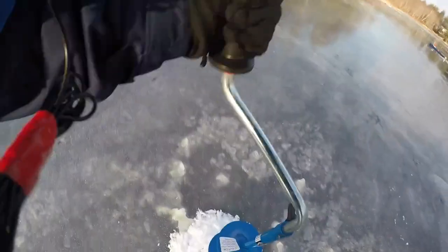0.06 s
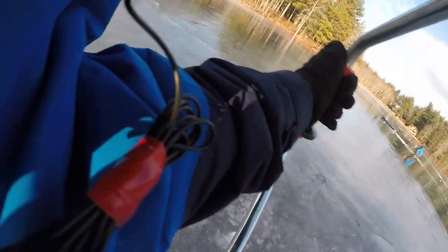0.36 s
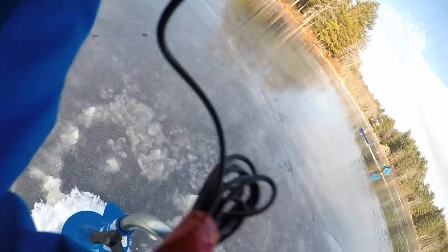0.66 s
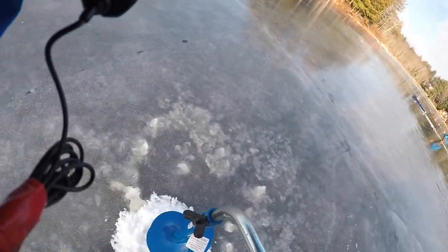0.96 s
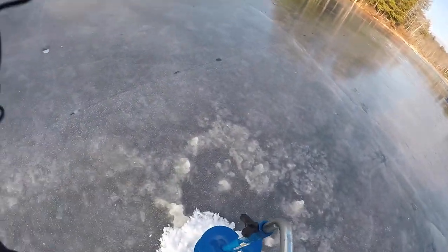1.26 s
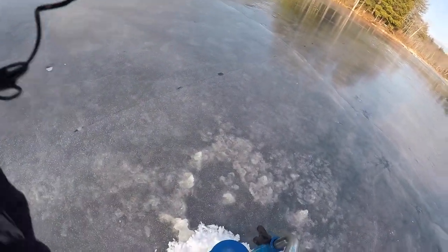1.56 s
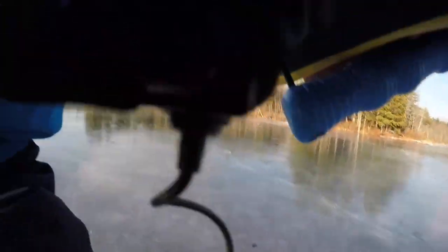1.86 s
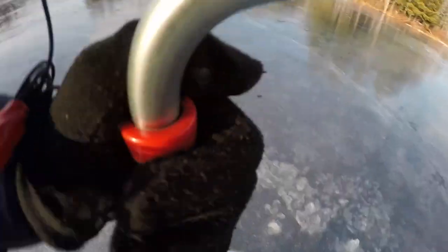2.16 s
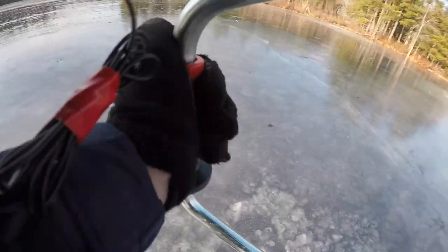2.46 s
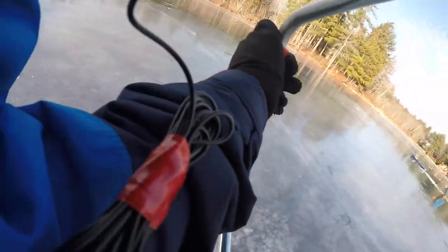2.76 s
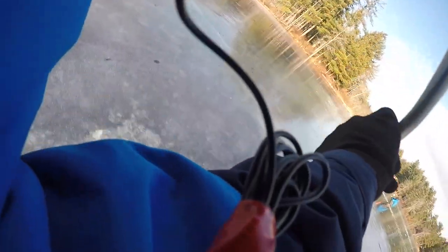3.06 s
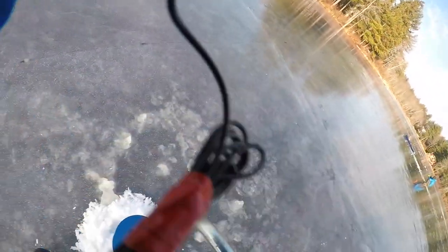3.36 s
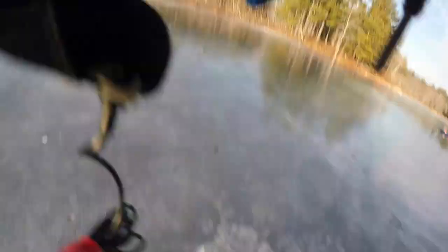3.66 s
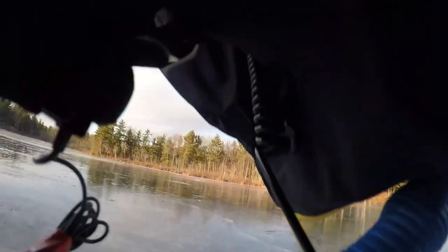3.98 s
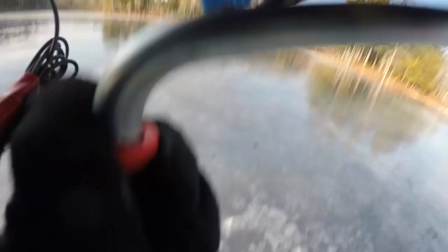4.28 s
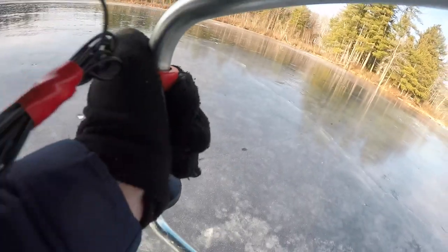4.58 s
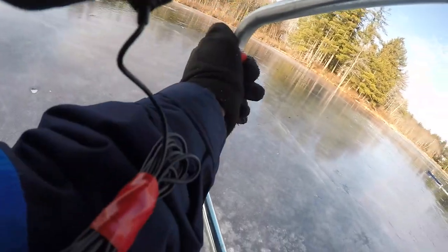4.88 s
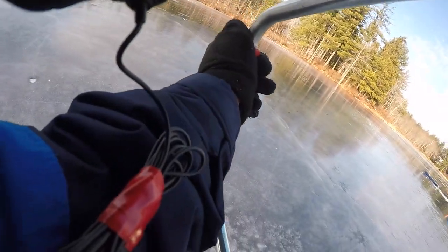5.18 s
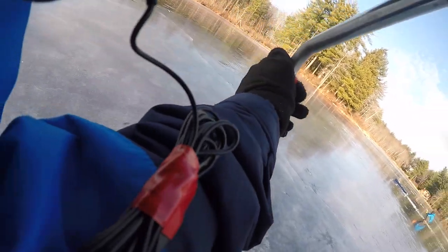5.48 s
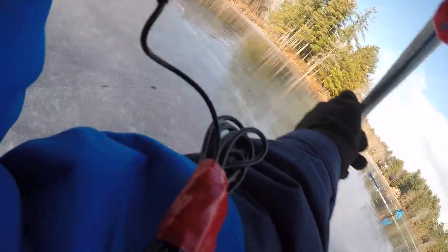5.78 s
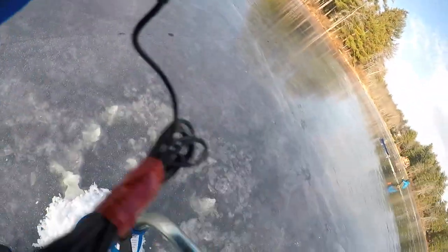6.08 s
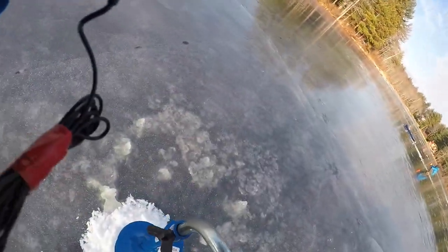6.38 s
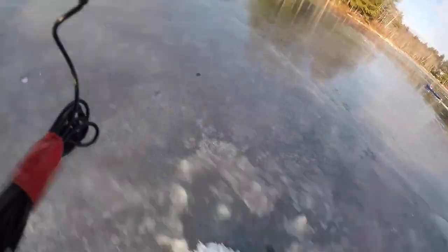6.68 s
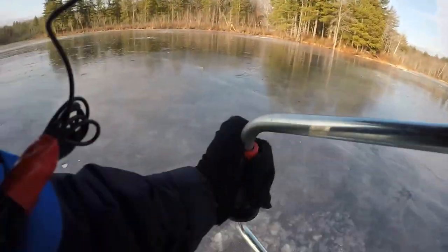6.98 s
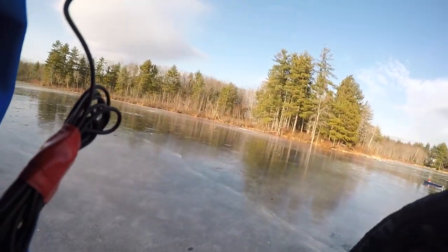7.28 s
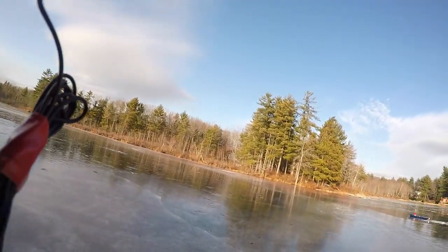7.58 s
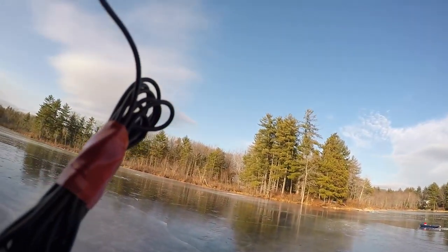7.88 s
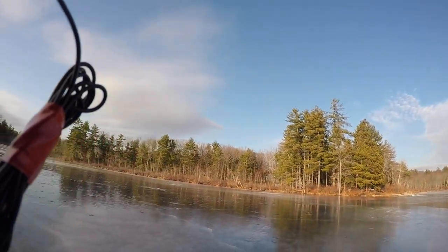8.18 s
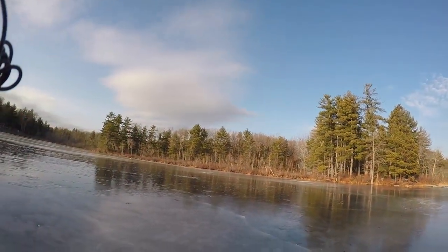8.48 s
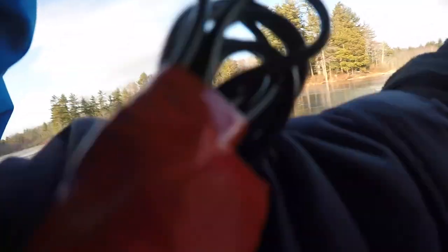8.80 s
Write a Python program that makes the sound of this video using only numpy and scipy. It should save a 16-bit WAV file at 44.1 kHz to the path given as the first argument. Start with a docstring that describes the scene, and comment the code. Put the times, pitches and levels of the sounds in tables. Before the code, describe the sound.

A hand auger grinds unevenly into ice while close gear ticks and a loose microphone plug pops, crackles and cuts the sound out.

```python
"""Hand auger in pond ice

Out on a frozen pond, an arm's length from the auger, with the microphone worn on the driller's jacket.
The blades shave and bite in uneven strokes and ring the steel; cloth rubs and hard bits of gear tick
right by the microphone. Its plug is loose: it pops, crackles in bursts and cuts the sound out."""
import sys
import numpy as np
from scipy import signal
from scipy.fft import rfft, irfft
from scipy.io import wavfile
from scipy.ndimage import uniform_filter1d

SR = 44100
rng = np.random.default_rng(int(sys.argv[2]) if len(sys.argv) > 2 else 0)


def waveform_to_disk(signal):
    """Save audio, clipped to [-1, 1], as 16-bit WAV at the path in sys.argv[1]."""
    frames = np.transpose(np.atleast_2d(signal))
    scaled = np.clip(frames, -1, 1) * 32767
    samples = np.round(scaled).astype(np.int16)
    wavfile.write(sys.argv[1], SR, samples)


N = 398663
TIME = np.arange(N) / SR

# Spectral shapes of the air, input hiss, sway, grinding, chips, bites, cloth, sparks: freq_hz, level_db
AIR_SPECTRUM = [(20, 4.5), (100, 2.5), (300, -5.5), (1000, -8), (3000, -18.5), (15000, -24)]
HISS_SPECTRUM = [(20, 20.5), (200, -1), (700, -3.5), (2000, -16), (15000, -25)]
SWAY_SPECTRUM = [(8, -1.5), (22, -3.5), (40, -7), (80, -10), (150, -19.5), (240, -24.5), (450, -37.5),
                 (1500, -85.5)]
GRIND_SPECTRUM = [(40, -13), (120, 0), (250, 3), (350, 3), (470, -2), (850, -1.5), (1600, -9),
                  (2300, -19.5), (3500, -15), (8000, -55)]
CHIP_SPECTRUM = [(500, -48), (1500, -8), (2400, 5), (4000, -3.5), (6000, -3.5), (8000, -7), (10500, -10.5),
                 (15500, -17.5)]
BITE_SPECTRUM = [(40, -20.5), (130, 4), (400, -2.5), (800, 2), (1500, -1.5), (2500, -10.5), (5000, -13.5),
                 (8000, -16), (11000, -18), (15500, -28.5)]
CLOTH_SPECTRUM = [(59, -10), (100, -5.5), (452, -16), (660, -15), (764, -17.5), (831, -18), (1090, -22),
                  (1660, -23.5), (2230, -26.5), (6350, -29), (15000, -40)]
SPARK_SPECTRUM = [(20, 1.5), (60, 18.5), (150, 8), (350, 5.5), (700, 1.5), (1500, -1), (3000, -4.5),
                  (6000, -8.5), (10000, -11.5), (15500, -15.5)]
# Resonances of the steel, while shaving and under a deep bite: centre_hz, width_hz, boost_db
SHAVING_MODES = [(470, 40, -1.5), (627, 51, 9.5), (870, 83, -0.5), (1036, 36, 10), (1155, 55, 10.5),
                 (1418, 44, 5.5), (1810, 81, 2), (2400, 270, -7.5), (2980, 150, 2.5), (3620, 150, 3),
                 (4140, 220, 2), (5130, 130, 4), (6600, 98, 1.5), (7550, 220, 1)]
BITING_MODES = [(340, 45, 8), (625, 49, 7.5), (970, 83, 3), (1177, 46, 9), (2220, 140, 5.5), (2800, 180, 3),
                (3700, 410, 7), (6120, 330, 2), (8950, 300, 3.5)]
# Event levels below are relative within each table; the functions set the balance.
# The microphone swaying with the body, one curve: time_s, level_db
SWAY_CURVES = [
    [(0.0, -20), (0.45, -26.5), (1.44, -24), (1.55, -18.5), (2.1, -27.5), (2.7, -51.5), (3.15, -35.5),
     (3.36, -30.5), (3.74, -17), (3.92, -26), (4.28, -22.5), (4.95, -38.5), (6.3, -32), (9.04, -37)],
]
# Pushes on the crank: start_s, end_s, rise_s, fall_s, end_grind_db, end_chips_db, build_db_per_s
CRANK_STROKES = [(-0.1, 0.034, 0.054, 0.28, -29.5, -31.5, -2), (0.093, 0.716, .1, 0.27, -30.5, -32.5, 12.5),
                 (0.746, 0.979, 0.29, 0.073, -27.5, -32, 23.5), (1.047, 1.546, .1, .1, -54, -53, 0),
                 (1.847, 1.99, 0.21, 0.29, -26.5, -33, 14.5), (2.347, 2.503, 0.16, .05, -39, -49.5, 70),
                 (2.823, 3.164, 0.6, 0.18, -41.5, -47.5, 1.5), (3.274, 3.682, 0.32, .25, -31, -32.5, 15.5),
                 (4.832, 5.127, .03, 0.044, -49, -64, 15), (5.26, 5.73, 0.042, 0.37, -32, -41.5, 15.5),
                 (5.92, 6.208, 0.64, 0.13, -35, -36, -1)]
# Soft bumps on the microphone: time_s, peak_db, pitch_hz
MIC_BUMPS = [(.104, -13, 60), (0.116, -8, 23.8), (2.001, -12.5, 75), (2.051, -8.5, 40), (3.716, -14, 26.2),
             (3.943, -14.5, 110), (4.048, -1.5, 58), (4.24, -16, 187.3), (4.283, -15.5, 330)]
# Blades squeaking on the ice: middle_s, length_s, peak_db, pitch_hz
BLADE_SQUEAKS = [(0.135, 0.029, -27, 3900), (0.841, 0.044, -30, 4170), (1.176, .012, -22, 3780),
                 (1.223, 0.026, -14.5, 3810), (1.26, 0.015, -22, 3930), (4.256, 0.093, -33.5, 7000)]
# Gear ticking against the microphone: time_s, peak_db, lower_hz, upper_hz, upper_vs_lower_db
GEAR_TICKS = [(0.269, -18, 1840, 5200, -16), (0.4526, -13.5, 1360, 5000, -3), (0.513, -17.5, 4010, 4800, 4),
              (0.632, -12, 3280, 8400, -6), (0.8653, -14, 1180, 4850, -12), (1.3924, -27.5, 3840, 5530, 19),
              (1.6684, 7.5, 1210, 5330, 19), (2.0106, -12.5, 1726, 5100, 7.5), (2.04, 2, 3500, 6380, 6),
              (2.0604, -9.5, 3000, 6360, -2), (3.702, 6.5, 3820, 5460, 9), (3.7787, -4.5, 4070, 5230, -2),
              (3.9434, -21, 1460, 4500, -23), (3.979, -14.5, 1350, 5260, -23),
              (4.1467, -17, 2300, 5030, -2), (4.2382, -4, 1650, 7100, -6.5), (4.2803, 0, 3200, 7030, 3.5),
              (5.1188, -32, 1200, 5320, -20), (5.176, -30, 1320, 5840, -17), (9.0287, -13, 1620, 4400, -13)]
# Modes that every tick rings: pitch_hz, level_db, t60_s
GEAR_MODES = [(1120, -14, 0.037), (1530, -13, 0.04), (2420, 8, 0.0094), (3670, 7, 0.018),
              (4206, -3.5, 0.023), (5000, -18.5, 0.021), (6050, -2, 0.044), (6740, -15, .05),
              (6940, -11.5, 0.12), (8550, -8, 0.055), (8900, -16, .02)]
# Blades catching and biting deep: start_s, end_s, rise_s, level_db
DEEP_BITES = [(0.674, 0.71, 0.045, -28.5), (1.17, 1.182, 0.047, -23), (1.205, 1.286, 0.045, -16),
              (1.47, 1.482, .01, -34), (1.512, 1.521, 0.0083, -33), (1.559, 1.572, 0.0023, -12),
              (1.613, 1.683, 0.074, -15.5), (1.722, 1.734, .02, -27), (2.33, 2.334, .003, -37),
              (3.776, 3.813, 0.023, -24.5), (5.12, 5.124, 0.0026, -37.5), (5.175, 5.182, .003, -41)]
# The shaft juddering, a heavy curve and then a light one: time_s, level_db, slips_per_s
JUDDER_CURVES = [
    [(1.76, -39, 70), (1.81, -22.5, 76), (1.88, -24.5, 96), (1.95, -29, 108), (2.01, -15, 72),
     (2.06, -21, 100), (2.12, -39, 53)],
    [(5.3, -44, 62), (5.5, -45, 61), (5.6, -30.5, 63), (5.7, -40, 75), (5.78, -57, 70)],
]
# The plug's contact breaking or closing: time_s, signed_height, held_s
PLUG_POPS = [(2.1327, -0.75, 0.0039), (2.138, 1.08, 0.01), (2.5018, -0.92, 0.028), (2.6029, .8, 0.0081),
             (4.316, -1, 0.011), (4.3224, 1.6, 0.0033), (4.3255, -1.27, 0.0095), (4.4432, -0.62, 0.0026),
             (4.4584, -0.82, 0.0018), (4.4633, -0.72, 0.0014), (4.4886, 0.34, 0.013), (4.7768, 0.66, 0.013),
             (6.364, -0.67, 0.021), (7.036, -0.23, 0.0059), (7.0711, 0.29, 0.0081), (7.1328, -0.14, 0.028),
             (7.365, -0.32, 0.0092), (7.6626, 0.45, 0.0055), (7.669, -0.24, 0.0041), (7.8898, 0.15, 0.0022),
             (7.951, -0.6, 0.0035), (7.9842, 0.21, 0.0086), (8.1827, -0.38, 0.012), (8.5025, -0.32, 0.0054),
             (8.6334, -.48, 0.0035), (8.7978, -0.89, 0.0011)]
# Contact open, nothing of the pond gets through: start_s, end_s
PLUG_DROPOUTS = [(2.134, 2.16), (2.502, 2.605), (4.316, 4.45), (4.559, 4.785), (6.364, 8.812)]
# Spells of the plug scraping in its socket: start_s, end_s, level_db, brightness_db
PLUG_SCRAPES = [(2.135, 2.141, 3, 2.5), (2.515, 2.544, -14.5, 7), (2.554, 2.59, -35.5, -10),
                (4.321, 4.341, -12.5, 2), (4.346, 4.359, -11, 2), (4.369, 4.383, -23.5, -3),
                (4.394, 4.414, -16, 2), (4.422, 4.47, -16, 3.5), (4.473, 4.502, -19.5, -5),
                (6.47, 6.501, -15.5, 5.5), (6.511, 6.536, -16, 8), (6.57, 6.61, -26, 0),
                (6.609, 6.653, -18, 2), (6.758, 6.799, -18, -1.5), (6.827, 6.918, -19.5, 4),
                (6.93, 7.015, -20.5, -1), (7.032, 7.074, -21.5, 5), (7.128, 7.173, -27.5, 1),
                (7.238, 7.273, -22, 6), (7.284, 7.407, -19, 4), (7.425, 7.457, -26.5, -12),
                (7.464, 7.572, -22, -4.5), (7.591, 7.6, -38, -21), (7.613, 7.679, -22.5, -7),
                (7.701, 7.74, -25.5, 4.5), (7.75, 7.819, -26, 3), (7.888, 7.891, -16.5, -12),
                (7.904, 7.911, -17, -15), (7.946, 7.95, -17.5, -17), (7.971, 7.986, -22.5, -5),
                (8.186, 8.218, -21.5, 2), (8.228, 8.316, -17.5, 5.5), (8.322, 8.36, -22, -11),
                (8.382, 8.556, -21.5, -10.5), (8.574, 8.649, -19.5, 2), (8.659, 8.684, -42, -19),
                (8.703, 8.733, -25.5, 1), (8.757, 8.814, -19, 5), (8.823, 8.855, -28, -20)]
# Single sparks in the plug: time_s, peak_db
PLUG_SNAPS = [(2.587, -6.5), (4.354, 3.5), (4.447, -2), (4.485, 7), (6.377, -3.5), (6.388, -5.5),
              (6.402, -8.5), (6.555, -18), (6.757, -4.5), (7.034, -3), (7.132, -2.5), (7.364, 5),
              (7.641, -0.5), (7.7, -5), (8.503, -9), (8.704, -3), (8.849, -9)]
# The jacket rubbing, one curve a rub: time_s, level_db
CLOTH_CURVES = [
    [(3.84, -41), (3.9, -46.5), (4.02, -37.5), (4.06, -26.5), (4.12, -36.5), (4.24, -31.5), (4.31, -34)],
    [(4.495, -27), (4.53, -18), (4.56, -29)],
    [(8.86, -35), (8.96, -32.5), (9.04, -38.5)],
]
# The input's overload ceiling: time_s, ceiling_db
INPUT_CEILING = [(0, -2.5), (4.8, -0.5), (6.3, 5.5), (9.04, -5.5)]


def amp(db):
    """Decibels to gain."""
    return 10 ** (np.asarray(db) / 20)


def unit(x):
    """Scales to rms 1."""
    return x / np.sqrt(np.mean(x ** 2) + 1e-20)


def add(mix, start_s, sound):
    """Mixes a sound in at start_s."""
    part = mix[max(round(start_s * SR), 0):][:len(sound)]
    part += sound[:len(part)]


def level(curves, fade_s=0.021):
    """Gain along dB curves, fading out beyond the ends of each."""
    gain = np.zeros(N)
    for curve in curves:
        times, db = np.transpose(curve)[:2]
        inside = np.interp(TIME, [times[0] - fade_s, times[0], times[-1], times[-1] + fade_s],
                           [0, 1, 1, 0])
        gain = np.maximum(gain, inside * amp(np.interp(TIME, times, db)))
    return gain


def wander(per_s):
    """Random drift of rms 1 that changes course per_s times a second."""
    return unit(np.interp(TIME * per_s, np.arange(N), rng.standard_normal(N)))


def colour(x, spectrum, modes=(), size=4096):
    """Minimum-phase filter of unit power: a spectral shape with resonances on top."""
    hz = np.fft.rfftfreq(size, 1 / SR)
    shape_hz, shape_db = np.transpose(spectrum)
    db = np.interp(np.log(hz + 1), np.log(shape_hz), shape_db)
    db += sum(boost * np.exp(-.5 * ((hz - centre) / width) ** 2) for centre, width, boost in modes)
    cepstrum = irfft(np.log(amp(db)))
    cepstrum[1:size // 2] *= 2
    cepstrum[size // 2 + 1:] = 0
    taps = irfft(np.exp(rfft(cepstrum)))
    return signal.oaconvolve(x, taps / np.linalg.norm(taps))[:N]


def tiny_snaps(per_s, spread_db, clump_db, clumps_per_s):
    """A dense train of impulses of uneven size that come in clumps."""
    size = amp(spread_db * np.minimum(rng.exponential(1, N), 5)) * rng.choice([-1, 1], N)
    fires = rng.random(N) < per_s / SR
    return unit(size * fires * amp(clump_db * wander(clumps_per_s)))


def steady_noise(spectrum, level_db):
    """An even bed of coloured noise."""
    return colour(rng.standard_normal(N), spectrum) * amp(level_db)


def body_sway():
    """The microphone rumbles as it sways with the driller's body."""
    return steady_noise(SWAY_SPECTRUM, -5) * level(SWAY_CURVES)


def wandering_colour(x, patch_db=3.0, patch_hz=70, patch_s=0.028, above_hz=1200, size=1024):
    """The grinding's colour drifts in soft random patches, most of all in the treble."""
    hz, t, bins = signal.stft(x, SR, nperseg=size)
    along_time = signal.windows.gaussian(61, patch_s / t[1])[None]
    along_freq = signal.windows.gaussian(21, patch_hz / hz[1])[:, None]
    noise = rng.standard_normal(bins.shape[::-1]).T
    patches = unit(signal.fftconvolve(noise, along_time * along_freq, "same"))
    depth_db = patch_db * (hz ** 2 / (hz ** 2 + above_hz ** 2))[:, None]
    return unit(signal.istft(bins * amp(depth_db * patches), SR, nperseg=size)[1][:N])


def push(start, end, rise, fall, fade_db=29):
    """Gain that climbs fade_db over the rise, holds from start to end and drops as much over the fall."""
    early = np.maximum(start - TIME, 0) / max(rise, .001)
    late = np.maximum(TIME - end, 0) / max(fall, .001)
    return amp(-fade_db * np.minimum(early + late, 8))


def stick_slip():
    """Phase of the blades sticking and slipping, one cycle a slip, at an unsteady rate."""
    times, _, slips_per_s = np.vstack(JUDDER_CURVES).T
    rate = np.interp(TIME, times, slips_per_s) * (1 + 0.066 * wander(60))
    return 2 * np.pi * np.cumsum(rate) / SR


def shaving(slip_phase, chatter=0.11):
    """Ice breaks under the blades and rings the steel: low grinding, a hiss of chips, stray flakes."""
    grind_gain, chip_gain = np.zeros(N), np.zeros(N)
    for start, end, rise, fall, grind_db, chips_db, build in CRANK_STROKES:
        # through most strokes the blades dig in further
        effort = push(start, end, rise, fall) * amp(-build * np.clip(end - TIME, 0, end - start))
        grind_gain = np.maximum(grind_gain, effort * amp(grind_db))
        chip_gain = np.maximum(chip_gain, effort * amp(chips_db))
    pressure = unit(1 + chatter * np.cos(slip_phase)) * amp(wander(25))
    coarse = tiny_snaps(9000, spread_db=2.7, clump_db=0.93, clumps_per_s=300) * pressure
    grind = colour(wandering_colour(coarse), GRIND_SPECTRUM, SHAVING_MODES) * amp(2.5)
    fine = tiny_snaps(14000, spread_db=2.7, clump_db=0.79, clumps_per_s=400) * pressure
    chips = colour(wandering_colour(fine), CHIP_SPECTRUM, SHAVING_MODES) * amp(1.5)
    return grind * grind_gain + (chips + flakes()) * chip_gain


def flakes(per_s=7, loudest_db=11, spread_db=6.5, t60_s=0.023, low_hz=1200, high_hz=5000, count=200):
    """Now and then a larger flake of ice snaps off, each at its own pitch."""
    out, t = np.zeros(N), np.arange(SR // 30) / SR
    waits, shortfalls = rng.exponential(1, (count, 2)).T
    pitches = low_hz * (high_hz / low_hz) ** rng.random(count)
    for start, shortfall, hz in zip(np.cumsum(waits) / per_s, shortfalls, pitches):
        band = signal.butter(1, [hz / 2, min(hz * 2, SR / 3)], "band", fs=SR)
        snap = unit(signal.lfilter(*band, rng.standard_normal(len(t))))
        add(out, start, snap * amp(loudest_db - spread_db * min(shortfall, 2) - 60 * t / t60_s))
    return out


def mic_bumps(knock_hz=185, knock_db=2, knock_t60_s=0.02, rise_s=0.0036):
    """Something bumps the microphone's housing: a damped low swing and a short knock."""
    out, t = np.zeros(N), np.arange(SR // 6) / SR
    knock = np.sin(2 * np.pi * knock_hz * t) * amp(knock_db - 60 * t / knock_t60_s)
    for start, db, hz in MIC_BUMPS:
        swing = np.sin(2 * np.pi * hz * t) * np.exp(-1.5 * hz * t)
        bump = (swing - knock) * (1 - np.exp(-t / rise_s))
        add(out, start, amp(db) * bump / abs(bump).max())
    return out


def squeaks(waver=0.025):
    """A blade sticks and slips fast enough to whistle for an instant."""
    out = np.zeros(N)
    for middle, length, db, hz in BLADE_SQUEAKS:
        count = round(length * SR)
        drift = unit(uniform_filter1d(rng.standard_normal(SR // 8), 60))[:count]
        whistle = np.sin(2 * np.pi * np.cumsum(hz * (1 + waver * drift)) / SR)
        add(out, middle - length / 2, amp(db) * np.hanning(count) * whistle)
    return out


def gear_ticks(modes_db=-14.5, crack_db=-2, trim_db=-0.5, rise_s=0.00033, t60_s=0.012):
    """Gear taps the microphone: two short rings in a crack of noise, over the gear's common modes."""
    out, t = np.zeros(N), np.arange(SR // 8) / SR
    for start, db, lower_hz, upper_hz, upper_db in GEAR_TICKS:
        modes = rings = 0
        for hz, mode_db, mode_t60_s in GEAR_MODES:
            tone = np.sin(2 * np.pi * (hz * t + rng.random()))
            modes += tone * amp(mode_db - 60 * t / mode_t60_s) * rng.uniform(0.29, 1.0)
        for hz, gain in (lower_hz, 1), (upper_hz, amp(upper_db)):
            band = signal.butter(1, [hz * 0.59, min(hz * 1.14, SR / 3)], "band", fs=SR)
            crack = unit(signal.lfilter(*band, rng.standard_normal(len(t))))
            rings += gain * (np.sin(2 * np.pi * hz * t) + amp(crack_db) * crack)
        tick = unit(rings) * amp(-60 * t / t60_s) + amp(modes_db) * modes
        tick *= 1 - np.exp(-t / rise_s)
        add(out, start, amp(db + trim_db) * tick / abs(tick).max())
    return out


def bites(release_share=0.72):
    """The blades catch deep and ring the loaded steel; the longer a bite, the slower it lets go."""
    gain = sum(amp(db) * push(start, end, rise, release_share * (end - start))
               for start, end, rise, db in DEEP_BITES)
    fractures = tiny_snaps(9000, spread_db=3.8, clump_db=2.4, clumps_per_s=160)
    crunch = wandering_colour(fractures, patch_db=0.5, patch_s=0.023)
    return colour(crunch, BITE_SPECTRUM, BITING_MODES) * gain * amp(0.5)


def judder(slip_phase):
    """Stick and slip shake the shaft: a heavy judder swings it whole, a light one buzzes with overtones."""
    swing = unit(np.cos(slip_phase) + 0.15 * np.cos(2 * slip_phase))
    buzz = unit(sum(np.cos(k * slip_phase) * (1 + .5 * wander(45)) for k in range(1, 6)))
    return (swing * level(JUDDER_CURVES[:1]) + buzz * level(JUDDER_CURVES[1:])) * amp(2.3 * wander(50))


def plug_pops(rebound=1.67, rebound_s=0.00092, droop_s=0.06, release_s=0.0039, coupling_hz=8):
    """A step of bias voltage: a spike, a rebound, a held swing, then the coupling capacitor drains."""
    out, t = np.zeros(N), np.arange(SR // 10) / SR
    step = np.exp(-t / droop_s) - rebound * (t / rebound_s * np.exp(1 - t / rebound_s)) ** 3
    for start, height, held in PLUG_POPS:
        release = np.exp(-(np.maximum(t - held, 0) / release_s) ** 2)
        add(out, start, height * step * release)
    return signal.lfilter(*signal.butter(1, coupling_hz, "high", fs=SR), out)


def plug_contact(dip_db=14.5, recover_s=0.18):
    """Gain of 0 while the plug is open; the microphone comes back quiet until its bias recharges."""
    gain = np.ones(N)
    for start, end in PLUG_DROPOUTS:
        recovery = amp(-dip_db * np.exp(-np.maximum(TIME - end, 0) / recover_s))
        gain *= np.where(TIME < start, 1, (TIME > end) * recovery)
    return uniform_filter1d(gain, 90)


def spark_bursts(burst_s=0.017, pause_s=0.00297, uneven=0.5, spread_db=2, count=24):
    """Gain and brightness of the sparking: each spell breaks into bursts and pauses of uneven length."""
    gain, brightness_db = np.zeros(N), np.zeros(N)
    for start, end, db, bright_db in PLUG_SCRAPES:
        brightness_db[round(start * SR):] = bright_db
        onset = start
        for length, pause, strength in rng.standard_normal((count, 3)):
            stop = onset + burst_s * np.exp(uneven * length)
            gain[round(onset * SR):round(min(stop, end) * SR)] = amp(db + spread_db * strength)
            onset = stop + pause_s * np.exp(uneven * pause)
    return gain, brightness_db


def plug_crackle(trail_hz=40, edge_db=-13.5, split_hz=2500, tilt=0.38):
    """The scraping plug crackles in bursts whose edges fade softly in and out."""
    bursts, brightness_db = spark_bursts()
    smooth = signal.butter(1, trail_hz, fs=SR)
    trail = .5 * (signal.lfilter(*smooth, bursts) + signal.filtfilt(*smooth, bursts))
    soft_edge = trail * amp(edge_db + 2 * wander(230))
    gain = np.maximum(uniform_filter1d(bursts, 24), soft_edge)
    impulses = tiny_snaps(16000, spread_db=2.9, clump_db=3.6, clumps_per_s=900)
    sparks = colour(impulses * gain, SPARK_SPECTRUM)
    lows = signal.lfilter(*signal.butter(1, split_hz, fs=SR), sparks)
    treble_lift = amp(tilt * uniform_filter1d(brightness_db - 0.5, 60))
    return amp(-0.5) * (lows / treble_lift + (sparks - lows) * treble_lift)


def plug_snaps(spike_s=0.0006, decay_s=0.00057, delay_s=0.00065):
    """Single sparks in the plug: a spike of either sign in a puff of noise."""
    out, t = np.zeros(N), np.arange(SR // 200) / SR
    for start, db in PLUG_SNAPS:
        spike = rng.choice([-1, 1]) * np.exp(-t / spike_s)
        snap = (spike + .5 * rng.standard_normal(len(t))) * np.exp(-t / decay_s)
        add(out, start + delay_s, amp(db) * snap / abs(snap).max())
    return out


def cloth_rub():
    """The jacket rubs right at the microphone in a grainy rustle."""
    grains = tiny_snaps(10000, spread_db=2.18, clump_db=1.9, clumps_per_s=150)
    return colour(grains, CLOTH_SPECTRUM) * level(CLOTH_CURVES) * amp(2.5)


def scene():
    """One microphone on both channels, through its loose plug; the input's hiss stays when it cuts out."""
    air = steady_noise(AIR_SPECTRUM, -46)
    input_hiss = steady_noise(HISS_SPECTRUM, -62.5)
    slip_phase = stick_slip()
    auger = shaving(slip_phase) + bites() + judder(slip_phase) + squeaks()
    jacket = cloth_rub() + body_sway() + mic_bumps() + gear_ticks()
    plug_noise = plug_pops() + plug_crackle() + plug_snaps()
    mono = (air + auger + jacket) * plug_contact() + plug_noise + input_hiss
    return np.array([mono, mono])


def record(dry):
    """The input overloads with a rounded knee, then a steep low-pass takes off the very top."""
    ceiling = amp(np.interp(TIME, *np.transpose(INPUT_CEILING)))
    clipped = dry / (1 + (dry / ceiling) ** 8) ** (1 / 8)
    low_pass = signal.firwin(255, 15700, window=("kaiser", 8), fs=SR)
    return signal.oaconvolve(clipped, low_pass[None], "same", axes=1)


dry = scene()
out = record(dry)
waveform_to_disk(out)
```